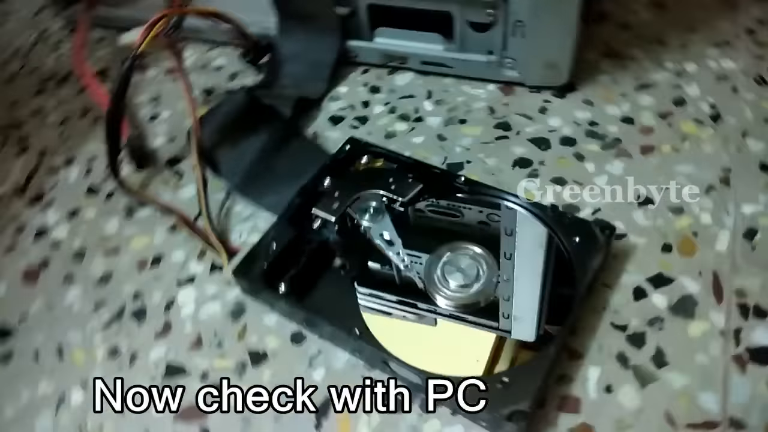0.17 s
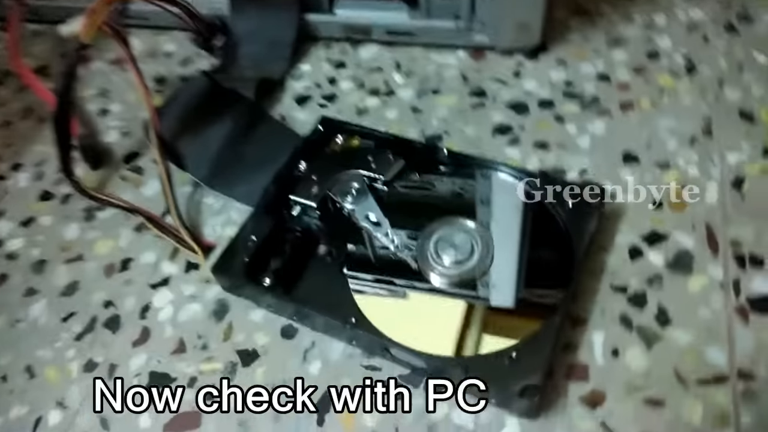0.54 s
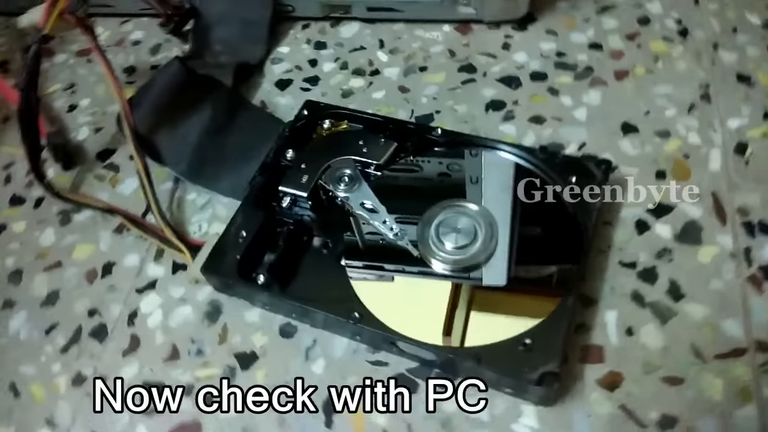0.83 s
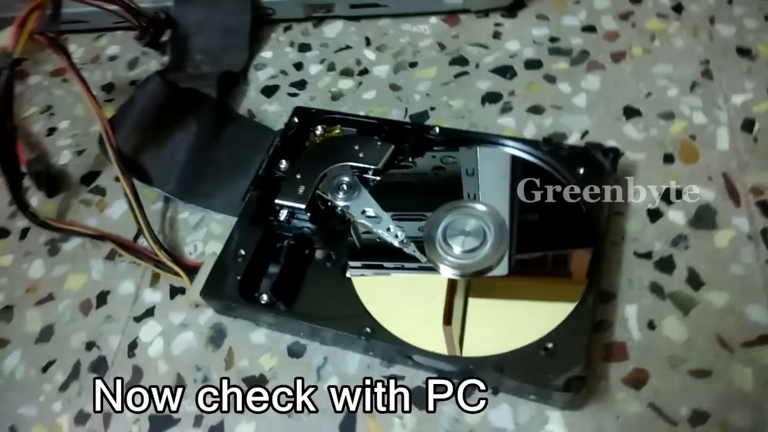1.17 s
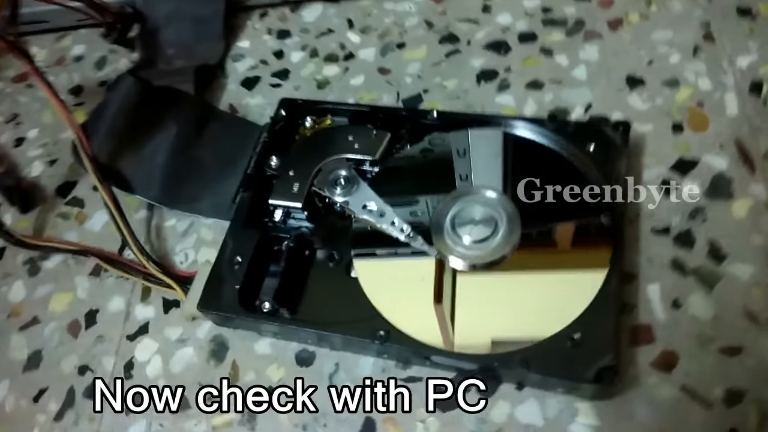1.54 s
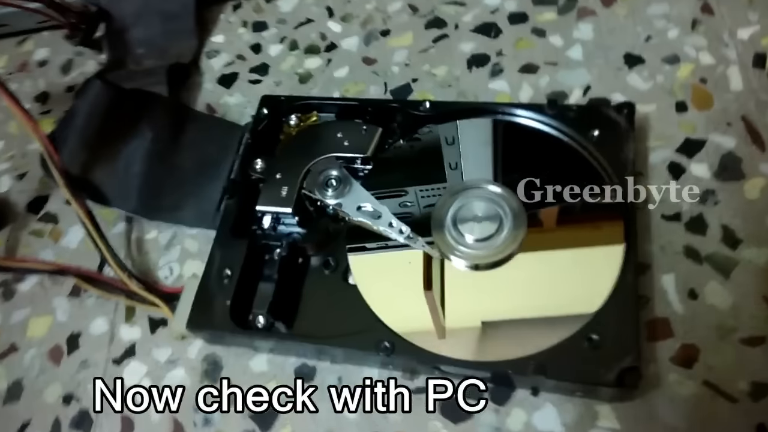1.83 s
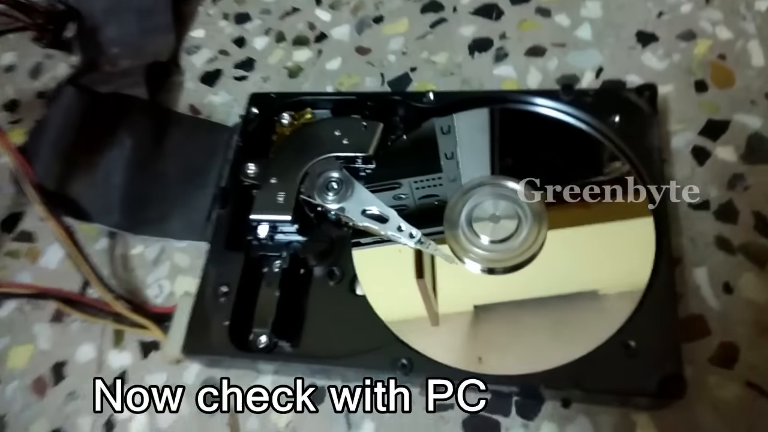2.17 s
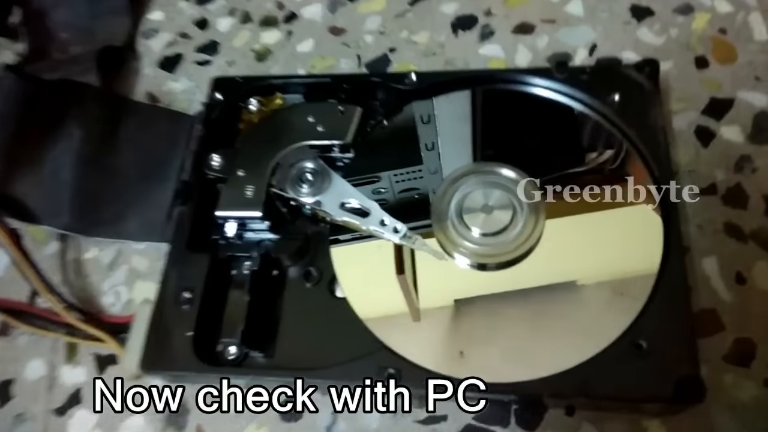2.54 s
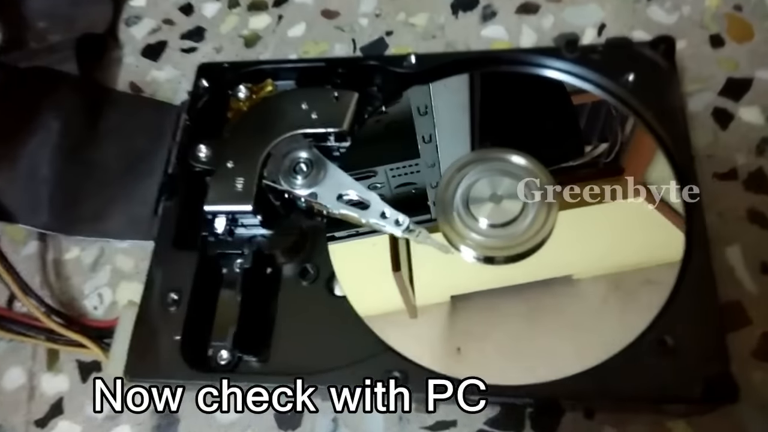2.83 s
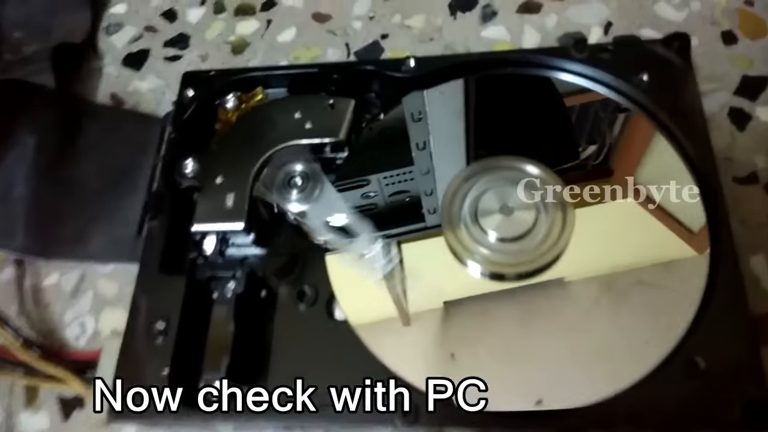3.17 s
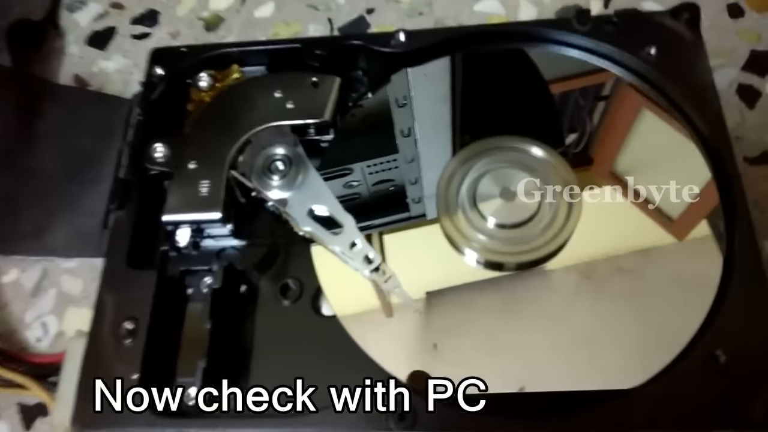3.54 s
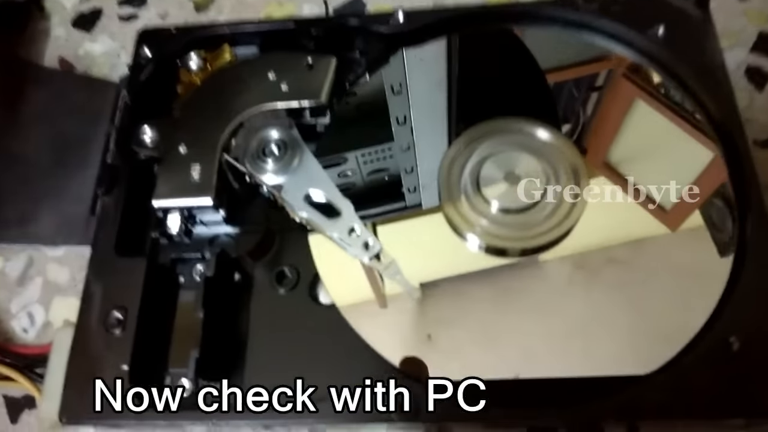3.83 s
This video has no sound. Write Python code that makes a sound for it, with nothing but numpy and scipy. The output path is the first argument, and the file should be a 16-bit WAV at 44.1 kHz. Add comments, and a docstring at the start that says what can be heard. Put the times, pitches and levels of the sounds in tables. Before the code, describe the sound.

An opened hard drive spins up with a rising, brightening hiss, then its arm clacks sharply twice.

```python
"""Computer fans hum steadily, as shaped noise, while a hand rumbles on the phone in lumps of deep noise. A thin
whistle with gritty scratching comes early, and faint ticks and rustles are short bands of noise. From about 1.5
s an opened hard drive on a stone floor spins up: its platter hisses louder and brighter (noise with a moving
upper edge), then its draught buffets the two microphone ports. After 3 s the arm slams into one stop and then
the other (fading sine waves and noise cracks), and at the end the hiss drops away."""
import sys
import numpy as np
from scipy import signal
from scipy.fft import rfft, irfft, next_fast_len
from scipy.io import wavfile
from scipy.ndimage import uniform_filter1d, map_coordinates

SR = 44100
rng = np.random.default_rng(int(sys.argv[2]) if len(sys.argv) > 2 else 0)


def output_pcm(signal):
    """Save a mono or channel-first signal as 16-bit PCM at the path in sys.argv[1].

    Samples are clipped to [-1, 1] before scaling.
    """
    pcm = np.clip(np.atleast_2d(signal).T, -1, 1) * 32767
    wavfile.write(sys.argv[1], SR, np.round(pcm).astype(np.int16))


N = 176400  # samples: 4 s

# How differently the two ports hear the drive: pitch_hz, left_over_right_db
PORT_BALANCE = [(500, 9.5), (1000, -16), (2400, 5.5), (3400, -11.5), (4500, -0.5), (5500, 0.5), (7200, -6),
                (8300, -12.5), (9300, -13), (10700, -22), (11800, -4), (12300, 15), (13500, 12.5),
                (15500, 6)]


def amp(db):
    """Turn decibels into a plain multiplier."""
    return 10 ** (np.asarray(db) / 20)


def unit(x):
    """Scale a sound to an average strength (rms) of 1."""
    return x / np.sqrt(np.mean(x ** 2) + 1e-20)


def along(points, hz):
    """Read a curve of (pitch_hz, value) points, joined by straight lines on a log pitch axis."""
    point_hz, values = np.transpose(points)
    return np.interp(np.log(hz + 1), np.log(point_hz + 1), values)


def curves(rows):
    """Join the rows over time: one value per sample for each column after the time."""
    time_s, *columns = np.transpose(rows)
    return np.array([np.interp(np.arange(N) / SR, time_s, column) for column in columns])


def wobble(per_s):
    """A smooth random curve that passes through per_s random points a second."""
    knots = rng.standard_normal(int(N * per_s / SR) + 4)
    return map_coordinates(knots, [np.arange(N) * per_s / SR])


def filtered(x, response):
    """Make each pitch in x louder or softer by the gain response(hz)."""
    padded = next_fast_len(N + SR // 2)
    gain = response(np.fft.rfftfreq(padded, 1 / SR))
    return irfft(rfft(x, padded) * gain, padded)[..., :N]


def closed(spectrum):
    """Gain that follows (pitch_hz, level_db) points and fades to silence beyond both ends."""
    below = (spectrum[0][0] * .8, -120)
    above = (spectrum[-1][0] * 1.1, -120)
    return lambda hz: amp(along([below, *spectrum, above], hz))


def panned(pair, pan):
    """Tilt left against right by (pitch_hz, left_over_right_db), half the tilt on each side."""
    return filtered(pair, lambda hz: amp(along(pan, hz) * np.array([[.5], [-.5]])))


def rush(spectrum, alike, pan, patchy_db):
    """Stereo noise of rms 1, in patches of random gain; mixing mid and side sets how alike the ears are."""
    z = signal.stft(rng.standard_normal((2, N)), nperseg=512)[2]
    patches = uniform_filter1d(rng.standard_normal(z.shape[1:]), size=5, axis=0)  # smooth across pitch
    patches = uniform_filter1d(patches, size=12, axis=1)  # smooth over time
    pair = signal.istft(z * amp(patchy_db * unit(patches)), nperseg=512)[1][:, :N]

    def mid_side_gain(hz):
        turn = np.arccos(np.clip(along(alike, hz), -1, 1)) / 2
        return closed(spectrum)(hz) * [np.cos(turn), np.sin(turn)]

    mid, side = filtered(pair, mid_side_gain)
    return unit(panned(np.array([mid + side, mid - side]), pan))


def band(hz, width_hz):
    """Stereo noise of rms 1 around one pitch; width_hz is where the gain has halved."""
    return unit(filtered(rng.standard_normal((2, N)), lambda f: 1 / (1 + ((f - hz) / width_hz * 2) ** 2)))


def window(start_s, length_s, fade_s):
    """Quick start, hold, exponential fade."""
    t = np.arange(N) / SR - start_s
    return np.clip(t / 0.0012, 0, 1) * np.exp(-np.clip(t - length_s, 0, None) / fade_s)


def fans():
    """Computer fans: broad noise that sways slightly in level, plus a narrow wavering note."""
    # Colour of the hum: pitch_hz, relative_level_db (per Hz)
    fan_colour = [(59, -37), (100, -4.5), (129, -14), (163, 0.5), (210, -11), (238, -3.5), (270, -8),
                  (300, 0.5), (489, -13), (543, -10.5), (903, -15.5), (1140, -14.5), (1890, -16),
                  (2150, -17.5), (3900, -29), (6200, -25.5), (8500, -28.5), (13000, -22.5), (15700, -37)]
    # How alike left and right are: pitch_hz, likeness (1 = the same, 0 = unrelated)
    fan_likeness = [(60, 0.77), (180, 1), (550, 0.57), (1650, -0.014), (4970, -0.058), (15000, 0.07)]
    # Stereo tilt: pitch_hz, left_over_right_db
    fan_tilt = [(60, -7), (120, -2.5), (240, 2), (480, 3), (950, -2), (1890, 8), (3770, 4), (7520, 0.5),
                (15000, 7.5)]
    # Wavering note, before its waver and stereo tilt: time_s, level_db
    note_level = [(0, -74), (.5, -70.5), (1, -70.5), (1.55, -71.5), (1.8, -74.5), (4, -99)]
    level_db, sway_db, sway_per_s = -58, .7, 2.64
    note_hz, note_width_hz, waver_db, waver_per_s = 872, 210, 4.5, 30

    note_gain = amp(curves(note_level) + waver_db * wobble(waver_per_s))
    note = note_gain * band(note_hz, note_width_hz)[0] * amp([[-3], [3]])  # right is 6 dB louder
    hum = rush(fan_colour, fan_likeness, fan_tilt, patchy_db=2.0)
    return amp(level_db + sway_db * wobble(sway_per_s)) * hum + note


def scratchy_whistle():
    """Narrow bands of noise whistle over scratching: steady noise roughened by random short puffs."""
    # Whistle bands, before their stereo tilt: pitch_hz, width_hz, level_db
    whistle_bands = [(12640, 130, -60), (15620, 70, -69)]
    # Colour of the scratching: pitch_hz, relative_level_db (per Hz)
    grit_colour = [(7500, -29), (9000, -7.5), (11000, -5), (13000, -10), (15000, -11)]
    start_s, length_s, fade_s = .2005, .14, .025
    scratch_db, grains_per_s, steady_part = -62.5, 230, 0.92

    grains = (rng.random(N) < grains_per_s / SR) * rng.uniform(.3, 1, N)
    grains[round(start_s * SR) + 60] = 2.3  # one strong grain near the start
    puffs = np.convolve(grains, np.exp(-np.arange(300) / 60))[:N] + steady_part
    grit = filtered(puffs * rng.standard_normal((2, N)), closed(grit_colour))
    scratch = amp(scratch_db) * unit(grit)
    whistle = sum(amp(db) * band(hz, width_hz) for hz, width_hz, db in whistle_bands)
    whistle = whistle * amp([[3], [-3]])  # left is 6 dB louder
    return window(start_s, length_s, fade_s) * (whistle + scratch)


def ticks():
    """Faint high ticks once a second, like a clock: short bursts of one noise band."""
    first_s, every_s, length_s = .47, 1, .03
    bursts = sum(window(first_s + k * every_s, length_s, fade_s=.012) for k in range(4))
    return bursts * amp(-64) * band(hz=11000, width_hz=2000)


def rustles():
    """Faint rustles and bumps: brief bands of noise that fade out."""
    # Each rustle or bump: start_s, length_s, pitch_hz, width_hz, level_db
    rustle_events = [(.235, .06, 800, 350, -66), (.455, .06, 800, 350, -63), (.428, .03, 1500, 1200, -65),
                     (.4, .09, 1800, 2000, -70), (.47, .008, 3100, 400, -71), (.535, .012, 1700, 500, -68),
                     (.588, .008, 700, 500, -64), (1.07, .05, 2000, 900, -68), (1.76, .04, 2400, 600, -70),
                     (2.52, .05, 240, 120, -59), (2.46, .16, 600, 250, -61)]
    return sum(amp(db) * window(start_s, length_s, .015) * band(hz, width_hz)
               for start_s, length_s, hz, width_hz, db in rustle_events)


def hand_rumble(draught_on):
    """A hand on the phone: lumps of deep noise, nearly alike in both ports, softer once draught sets in."""
    # Level before the draught lowers it: time_s, level_db
    hand_level = [(0.0, -69), (0.1, -54), (0.17, -62), (0.37, -53), (0.44, -64), (0.57, -53), (0.6, -68),
                  (0.64, -46), (0.8, -68), (0.82, -57), (1.14, -63), (1.23, -89), (1.28, -61), (1.49, -75),
                  (1.62, -72), (1.68, -49.5), (1.77, -52), (1.79, -78), (1.84, -49.5), (1.9, -97),
                  (2.0, -61), (2.1, -86), (2.21, -52.5), (2.47, -55), (2.63, -62), (2.75, -56)]
    # Colour of the rumble: pitch_hz, relative_level_db (per Hz)
    hand_colour = [(25, -28), (42, -4), (58, 4.5), (75, -8.5), (110, -21), (160, -17), (200, -41)]
    noise = rush(hand_colour, [(60, 0.88)], [(60, -0.92)], patchy_db=0.0)
    lumps = unit(amp(0.67 * wobble(20)) * noise)
    return amp(curves(hand_level)) * lumps * (1 - 0.69 * draught_on)


def rumble():
    """Hand rumble plus draught: the platter's air buffets each port with its own gusts of deep noise."""
    # Draught on each port: time_s, left_level_db, right_level_db
    draught_level = [(2.65, -79, -56), (2.76, -47, -51), (2.82, -53, -53), (2.92, -39.5, -73),
                     (3.05, -50, -60), (3.12, -39.5, -55), (3.25, -37.5, -41), (3.31, -48, -47),
                     (3.36, -34, -27.5), (3.47, -50, -31), (3.58, -29, -37.5), (3.66, -42.5, -59),
                     (3.74, -38.5, -43), (3.8, -57, -60), (4, -69, -74)]
    # Colour of the gusts: pitch_hz, relative_level_db (per Hz)
    gust_colour = [(15, -32), (25, -2.5), (70, 3.5), (113, -12.5), (139, -11.5), (178, -16), (276, -34.5),
                   (400, -36), (520, -38), (880, -120)]
    draught_start_s = draught_level[0][0]
    draught_on = np.clip((np.arange(N) / SR - draught_start_s) / .1, 0, 1)  # fades in over 0.1 s
    noise = rush(gust_colour, [(60, 0.19)], [(60, 0)], patchy_db=4)
    gusts = unit(amp(1.2 * np.array([wobble(20), wobble(12)])) * noise)
    return hand_rumble(draught_on) + amp(curves(draught_level)) * gusts * draught_on


def platter():
    """Air dragged by the disc: noise whose upper edge moves, over a lower whir and two singing bands."""
    # Hiss, with the level taken before the edge cuts it: time_s, level_db, upper_edge_khz
    spin_curve = [(1.5, -83, 8.4), (1.8, -67, 7.1), (2.06, -62, 9.2), (2.17, -64, 9.7), (2.24, -57, 8.4),
                  (2.36, -51.5, 8.8), (2.42, -52.5, 11), (2.52, -48.5, 11.7), (2.73, -43.5, 12.4),
                  (2.79, -42.5, 15.5), (3.1, -41, 23), (3.2, -38.5, 14.8), (3.4, -39.5, 15.7),
                  (3.52, -41, 17), (3.7, -41.5, 15.2), (3.78, -55, 14), (4, -57, 15.6)]
    # Colour of the hiss: pitch_hz, relative_level_db (per Hz)
    hiss_colour = [(2530, -36), (4300, -9), (4590, -55), (4660, -12), (5550, 1), (6390, -1.5), (7160, -4.5),
                   (7800, -3.5), (8510, -5), (10800, -13.5), (11600, -5.5), (12200, -14), (12600, -2),
                   (14900, -8), (15700, -5)]
    # Level of the lower whir: time_s, level_db
    whir_level = [(1.6, -74), (1.9, -66.5), (2.1, -63.5), (2.3, -62.5), (2.5, -56), (2.7, -55.5),
                  (3.1, -54), (3.3, -51), (3.42, -51), (3.55, -53.5), (3.7, -51.5), (3.8, -56.5),
                  (4, -56.5)]
    # Colour of the whir: pitch_hz, relative_level_db (per Hz)
    whir_colour = [(380, -26), (520, 5.5), (680, -15.5), (1050, -43), (1250, -4), (1450, -6), (1700, 2.5),
                   (2150, -8.5), (2650, 2), (3000, 3), (3500, 1.5), (3900, 0), (4400, -11)]
    # Bands that sing in the hiss: pitch_hz, width_hz, left_over_right_db
    sing_bands = [(7220, 600, -10.5), (12400, 900, 8.5)]
    # Their levels before the stereo tilt: time_s, first_band_level_db, second_band_level_db
    sing_level = [(1.6, -87, -89), (2.05, -92, -74), (2.22, -65.5, -72), (2.5, -57.5, -71),
                  (2.72, -53, -79), (2.82, -53, -52), (3.7, -53.5, -57), (3.78, -72, -72), (4, -72, -70)]
    edge_steepness = 12.4

    level_db, edge_khz = curves(spin_curve)
    noise = rush(hiss_colour, [(5000, 0.019)], PORT_BALANCE, patchy_db=2.0)
    hz, t, z = signal.stft(noise, SR, nperseg=512)
    edge_hz = 1000 * edge_khz[np.minimum(t * SR, N - 1).astype(int)]
    edge_gain = 1 / (1 + (hz[:, None] / edge_hz) ** edge_steepness)
    hiss = signal.istft(z * edge_gain, nperseg=512)[1][:, :N]
    hiss = amp(level_db + 0.22 * wobble(9.2)) * hiss

    sing = np.zeros((2, N))
    for sing_db, (sing_hz, width_hz, pan_db) in zip(curves(sing_level), sing_bands):
        sing += amp(sing_db + pan_db * np.array([[.5], [-.5]])) * band(sing_hz, width_hz)

    whir = rush(whir_colour, [(500, 0.51), (1400, 0.42), (3000, -0.22)], PORT_BALANCE, patchy_db=2.0)
    return hiss + amp(curves(whir_level)) * whir + sing


def room(dry_arm):
    """The room answers the arm with a tail of fading noise."""
    t60_s, level_db = 0.21, -17  # t60: time to fade by 60 dB
    t = np.arange(SR // 2) / SR
    tail = rng.standard_normal((2, len(t))) * amp(-60 * t / t60_s)
    tail = tail / np.linalg.norm(tail[0])
    return amp(level_db) * signal.fftconvolve(dry_arm, tail, axes=1)[:, :N]


def arm():
    """Each contact rings the metal's own pitches anew and cracks; resting on a stop chokes the ringing."""
    # Contacts: start_s, low_modes_db, middle_modes_db, high_modes_db, crack_db (before the crack's
    # colour and boost), ring_time_factor (multiplies the free ring time)
    contacts = [(3.1214, -30, -32, -27, -26, 1), (3.1232, -13, -23, -20, -18, 1.3),
                (3.1258, -28, -24, -21, -20, 1), (3.1317, -18, -10, -22, -16, 1.3),
                (3.1378, -30, -24, -27, -21, 1), (3.1452, -36, -28, -34, -28, .35),
                (3.149, -28, -38, -38, -31, .45), (3.154, -40, -31, -38, -32, .3),
                (3.161, -32, -44, -44, -35, .4), (3.167, -48, -37, -44, -36, .35),
                (3.181, -48, -40, -46, -38, .3), (3.196, -50, -43, -48, -40, .3),
                (3.3328, -38, -22, -15, -23, .5), (3.3352, -27, -32, -25, -28, .8),
                (3.338, -25, -17, -23, -21, .7), (3.3435, -27, -29, -27, -28, .7),
                (3.3525, -42, -33, -38, -34, .35), (3.359, -40, -35, -37, -32, .35),
                (3.367, -46, -39, -40, -34, .35), (3.377, -48, -40, -42, -36, .35)]
    # Ringing of arm and casting: pitch_hz, first_stop_db and second_stop_db (added to the contact's
    # level), free_t60_s (time to fade by 60 dB), left_over_right_db
    modes = [(1416, -2.5, -20, .1, -8), (1460, -25, -3, .08, -6), (3386, 1, -12, .075, -6),
             (3422, -17, 0, .07, -4), (5000, -4, 0, .04, -2), (5185, -3, -3, .03, -2),
             (5310, 1, 1, .035, -2), (1600, -12, -14, .04, 0), (1831, -19, -15, .06, 3),
             (1940, -19, -9, .06, 3), (2623, -14, -40, .05, 0), (2870, -19, -24, .05, 0),
             (2977, -24, -14, .05, 0), (3239, -10, -12, .05, -3), (3570, -14, -14, .05, -3),
             (4610, -16, -5, .04, -2), (5720, -5, -4, .045, -1), (6590, -14, -4, .035, -2),
             (7160, -8, -9, .04, -3), (9020, -8, -8, .025, -1), (9990, -6, -10, .025, -1)]
    # Colour of the crack: pitch_hz, gain_db
    crack_colour = [(140, -14), (300, -12), (520, -14.5), (750, -25.5), (1130, -45), (1400, 1), (2300, -10),
                    (3300, 0), (4400, -7.5), (5300, -1), (8000, -3.5), (10900, -13.5), (12900, -3.5),
                    (15700, -7)]
    # The arm comes to rest on a stop: start_s, loss_db
    chokes = [(3.1415, 14), (3.349, 7)]
    low_below_hz, middle_below_hz, second_stop_s = 2300, 4300, 3.25
    rise_s, choke_s, crack_t60_s, crack_boost_db = .0016, .004, .024, 5.5
    ragged_db, ragged_per_s = 2, 120
    port_lag_s, lag_top_hz = 7e-5, 3530  # above this pitch the phase between ports grows no further

    ring, crack = np.zeros((2, N)), np.zeros((2, N))
    t = np.arange(SR // 4) / SR
    hz, first_db, second_db, t60_s, pan_db = np.transpose(modes)[:, :, None]
    side = np.array([.5, -.5])[:, None, None]
    cycles = hz * t + np.minimum(hz, lag_top_hz) * side * port_lag_s
    tones = amp(side * pan_db) * np.sin(2 * np.pi * cycles)
    ragged = ragged_db * np.array([wobble(ragged_per_s) for _ in modes])

    for start_s, low_db, middle_db, high_db, crack_db, ring_factor in contacts:
        start = round(start_s * SR)
        at = slice(start, start + len(t))
        group_db = np.where(hz < low_below_hz, low_db, np.where(hz < middle_below_hz, middle_db, high_db))
        stop_db = first_db if start_s < second_stop_s else second_db
        hit_db = group_db + rng.normal(0, 1, hz.shape) + stop_db + ragged[:, at]
        # only rests still to come choke this contact
        choke_db = sum(loss_db * np.clip((start_s + t - rest_s) / choke_s, 0, 1)
                       for rest_s, loss_db in chokes if rest_s > start_s)
        decay_db = 60 * t / (ring_factor * t60_s)
        ringing = (amp(hit_db - choke_db - decay_db) * tones).sum(1)
        ring[:, at] += ringing * (1 - np.exp(-t / rise_s))
        crack[:, at] += amp(crack_db - 60 * t / crack_t60_s) * rng.standard_normal((2, len(t)))

    half_tilt = [(tilt_hz, .5 * db) for tilt_hz, db in PORT_BALANCE]
    crack = panned(filtered(crack, closed(crack_colour)), half_tilt)
    dry_arm = ring + amp(crack_boost_db) * crack
    return dry_arm + room(dry_arm)


def scene():
    """Add the background, the small sounds, the rumble and the drive."""
    background = fans() + scratchy_whistle() + ticks() + rustles()
    return background + rumble() + platter() + arm()


def record(dry):
    """The phone rolls off deep bass and keeps nothing above its band limit."""
    bass_hz, top_hz = 39.5, 15750  # the gain is one half at bass_hz
    return filtered(dry, lambda hz: (hz < top_hz) * hz ** 3 / (hz ** 3 + bass_hz ** 3))


dry = scene()
out = record(dry)
output_pcm(out)
```